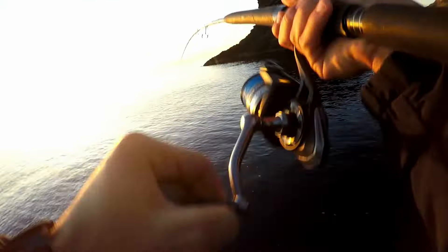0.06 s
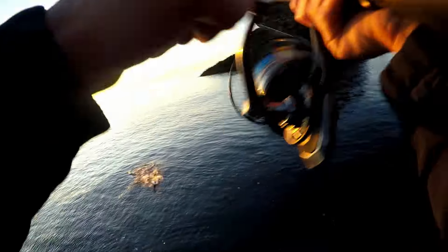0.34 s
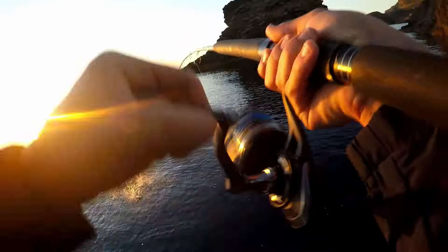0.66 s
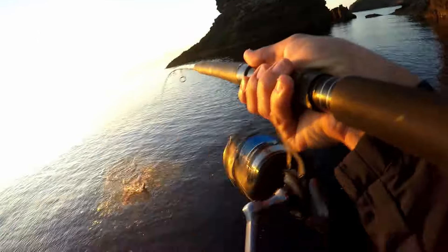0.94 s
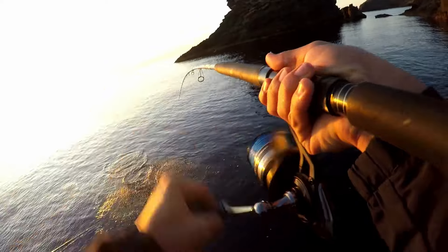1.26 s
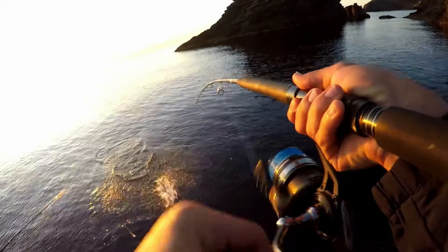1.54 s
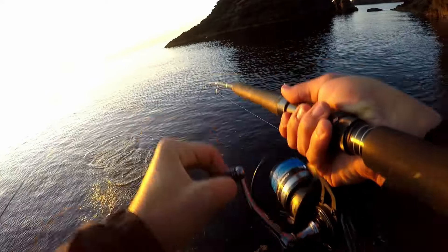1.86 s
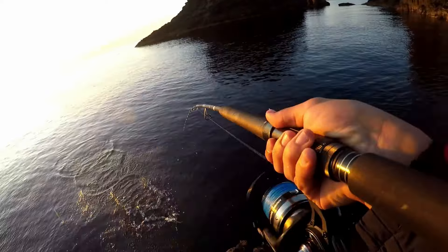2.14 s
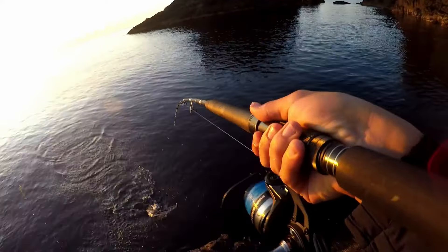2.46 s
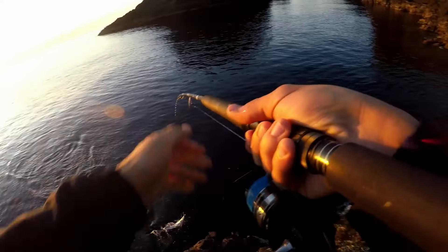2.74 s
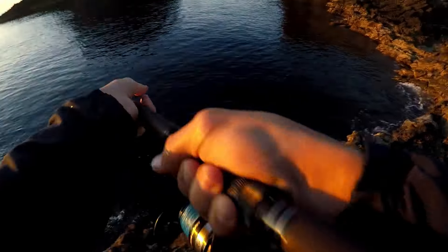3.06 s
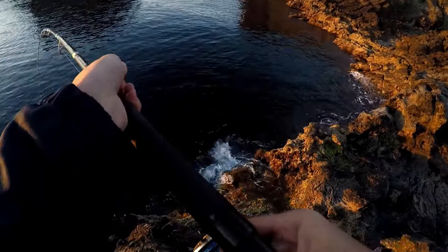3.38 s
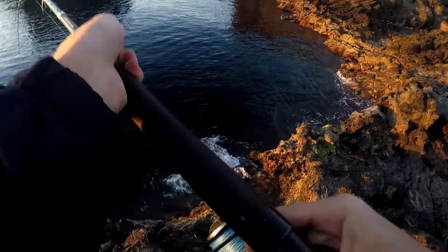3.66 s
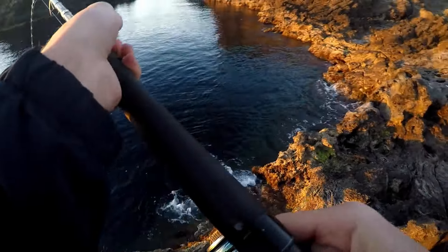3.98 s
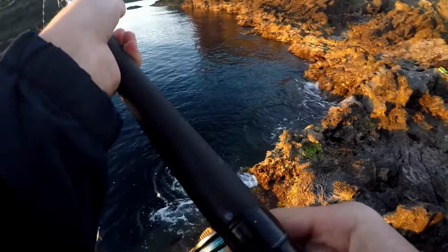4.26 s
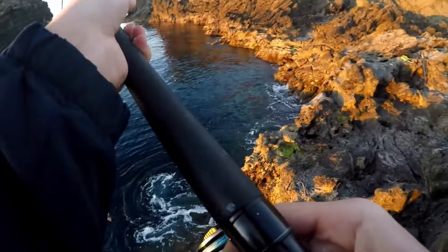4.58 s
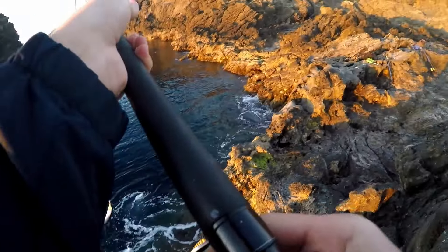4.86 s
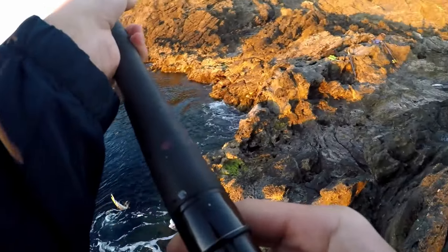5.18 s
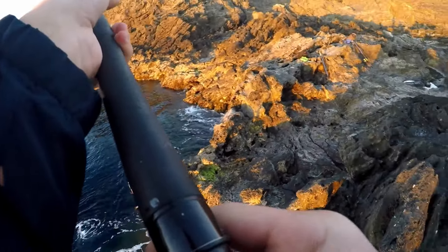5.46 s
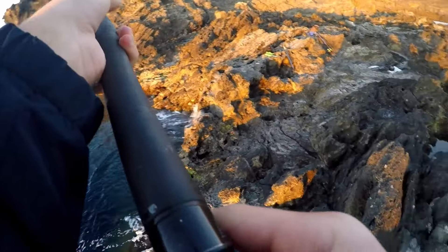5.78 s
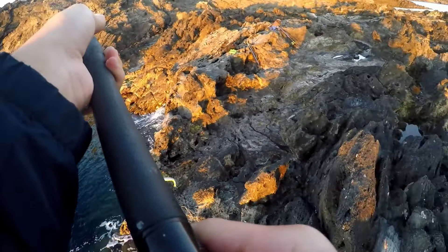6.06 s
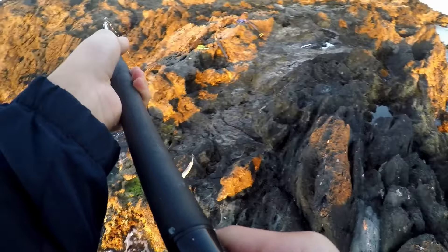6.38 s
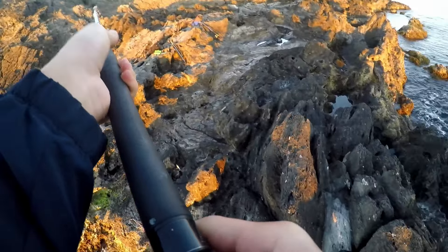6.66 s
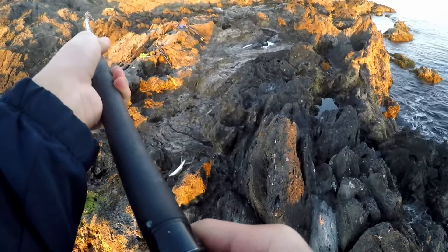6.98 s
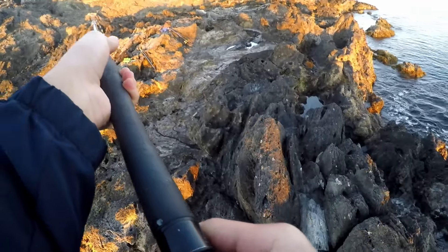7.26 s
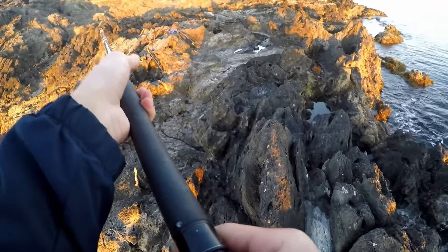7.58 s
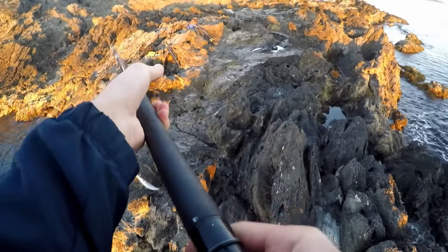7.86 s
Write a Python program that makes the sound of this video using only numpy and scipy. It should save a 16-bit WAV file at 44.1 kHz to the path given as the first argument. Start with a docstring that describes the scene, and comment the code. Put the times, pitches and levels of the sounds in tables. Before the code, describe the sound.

A fishing reel is cranked close by, whirring with fine ticks and short, shaky squeaks for about three seconds. Cloth then rubs heavily across the body-worn camera, and its plastic housing gives dull, ringing knocks through the rest, joined by small tackle clicks and a couple of rod clacks. Throughout, sea water gurgles and splashes among the rocks under low, gusty wind on the microphone, starting in mono and opening into stereo.

```python
"""A rocky shore, where someone is fishing, heard from a body-worn camera in a plastic housing.
A spinning reel whirrs, ticks and squeaks as a small fish is wound in, and clacks against the rod.
Then a sleeve drags past, knocks set the housing ringing, and bits of tackle click.
All along, waves gurgle, splash and fizz in the cove, and wind rumbles on the two microphone
openings (the ports). The sound starts in mono and widens to stereo."""
import sys
import numpy as np
from scipy import signal
from scipy.io import wavfile
from scipy.ndimage import uniform_filter1d

SR = 44100
rng = np.random.default_rng(int(sys.argv[2]) if len(sys.argv) > 2 else 0)


def store_wav(level_fs):
    """Save 16-bit WAV to argv[1]."""
    pcm = np.round(np.clip(np.atleast_2d(level_fs), -1, 1) * 32767)
    wavfile.write(sys.argv[1], SR, pcm.T.astype(np.int16))


N = 354123
TIME = np.arange(N) / SR

# how hard the reel is cranked: (time [s], level [dB])
CRANKING = [(0, -39), (.2, -46), (.35, -38), (.8, -35.5), (1.1, -41), (1.3, -34.5), (1.7, -38.5),
            (2.1, -37.5), (2.301, -45), (2.6, -48), (3, -100)]
# the sleeve drags over the housing: (start [s], length [s], level [dB])
SLEEVE_DRAGS = [(2.52, 0.063, -30), (2.798, 0.028, -20), (2.86, .075, -20), (2.95, 0.19, -22),
                (3.03, 0.08, -22.5), (7.92, .1, -23)]


def reel():
    """Turning gears buzz and make the reel's body ring with a whirr, while the spool squeaks."""
    # ringing notes of the reel's body: (pitch [Hz], width [Hz], level [dB])
    body_notes = [(1060, 100, -21), (1517, 150, 6), (2320, 120, -6), (2626, 160, 2.5), (3840, 990, 3),
                  (4700, 530, -10), (5520, 320, -0.5), (9350, 2200, -6), (12900, 3100, -1.5)]
    rubbing = rng.standard_normal(N) * from_db(2.2 * drift(190) + 2.2 * drift(23))
    teeth = chatter(per_s=95, unevenness=0.46) + 0.037 * rubbing
    gear_note = [(2410, 470, 0)]   # the teeth rasp at one pitch
    gears = rms_one(resonate(resonate(teeth, gear_note), gear_note))
    body = rms_one(resonate(rubbing, body_notes))
    whirr = from_db(in_time(CRANKING)) * (body + from_db(-11.5) * gears)
    return filtered(whirr + squeaks(), 5100, "low")


def squeaks():
    """The dry spool sticks and slips, making short, shaky, sliding tones with a rasp below each. A few brief,
    high rows are other sounds: scrapes as the reel clacks in its seat near 1.30 and 1.43 s, and a metallic
    clink at 2.39 s."""
    # (start [s], length [s], level [dB], first pitch [Hz], last pitch [Hz], pitch shake [Hz], rasp [dB])
    squeals = [(.078, .05, -42, 1200, 2600, 220, -3), (.1, .055, -39, 1500, 1600, 240, -12),
               (.278, .07, -35.5, 1200, 2750, 130, -12), (.294, .036, -40, 2050, 2800, 120, 2),
               (.372, .024, -44, 3600, 4050, 60, -25), (.67, .047, -39, 2500, 2600, 190, -14),
               (.825, .053, -37.5, 2700, 2600, 190, -18), (1.02, .05, -31, 2640, 2400, 200, -11),
               (1.13, .05, -33, 2300, 2480, 190, -11), (1.299, .022, -34, 5700, 5600, 600, 0),
               (1.311, .022, -26.5, 1620, 1270, 90, -16), (1.304, .03, -31.5, 1900, 2750, 240, -10),
               (1.33, .034, -34, 2620, 2330, 200, -12), (1.382, .028, -38, 2400, 2300, 260, -1),
               (1.42, .04, -28, 2200, 2330, 320, -2), (1.425, .035, -38.5, 3900, 4000, 240, 0),
               (1.486, .023, -24.5, 2790, 2700, 80, -3), (1.567, .032, -32, 2640, 2460, 130, -2),
               (1.667, .038, -35.5, 2480, 2560, 190, -6), (1.835, .05, -39, 2300, 2357, 170, -11),
               (1.96, .053, -40, 2330, 2450, 200, -8), (2.118, .05, -36.5, 2400, 2470, 140, -11),
               (2.37, .05, -37, 2120, 2020, 130, -14), (2.392, .026, -37, 4200, 4150, 180, -16)]
    rasp_ratio = 0.66   # the rasp's pitch as a share of the tone's
    shake = filtered(drift(500), 100, "high")
    flutter = evened(from_db(3 * drift(190)), window_s=.03)
    slips = chatter(per_s=173.3, unevenness=.35)
    grabs = signal.lfilter([1], [1, -np.exp(-1 / (.002 * SR))], slips)   # each fades over about 2 ms
    rasp = evened(filtered(rng.standard_normal((2, N)) * (grabs + 0.28), 255, "low"), window_s=0.022)
    out = np.zeros(N)
    for start, length, db, from_hz, to_hz, shake_hz, rasp_db in squeals:
        now = (TIME >= start) & (TIME < start + length)
        hz = np.linspace(from_hz, to_hz, now.sum()) + shake_hz * shake[now]
        angle = 2 * np.pi * np.cumsum(hz) / SR
        tone = np.sqrt(2) * np.sin(angle) * flutter[now]
        scrape = rasp[0, now] * np.cos(rasp_ratio * angle) + rasp[1, now] * np.sin(rasp_ratio * angle)
        out[now] += from_db(db) * swell(start, length)[now] * (tone + from_db(rasp_db) * scrape)
    return out


def line():
    """The line snaps onto the spool in fine, bright ticks while the reel turns."""
    # ringing notes of one tick: (pitch [Hz], width [Hz], level [dB])
    tick_notes = [(5770, 170, 14), (8700, 1500, -24), (13500, 1500, -17)]
    times, db = scattered((CRANKING[0][0], CRANKING[-1][0]), per_s=12, level_db=14, spread_db=6)
    return resonate(clicks_at(times, from_db(db)) * from_db(in_time(CRANKING)), tick_notes)


def rod():
    """The reel clacks in its seat: each hit crunches and rings the seat, the rod and the reel's frame."""
    # how hard each part is hit: (time [s], seat [dB], rod [dB], frame [dB])
    clacks = [(1.3025, -27, -31, -18), (1.3078, -22, -30, -16), (1.3128, -24, -32, -23),
              (1.3272, -30, -28, -20), (6.6272, -18, -13, -32), (6.6288, -18.5, -14, -30),
              (6.634, -27, -30, -40), (7.899, -29, -36, -45), (7.9217, -16, -16, -34),
              (7.9245, -23, -23, -36)]
    # notes of the bright seat, the woody rod and the frame: (pitch [Hz], level [dB], ring time [s])
    seat_notes = [(2540, -1, 0.0057), (3800, -4.5, 0.008), (6140, -11, 0.018), (6850, -23, 0.012),
                  (12200, -26, 0.0056)]
    rod_notes = [(507, -6.5, 0.013), (1000, -7, 0.014)]
    frame_notes = [(1415, 2.5, 0.017), (2150, -9, 0.018)]
    times, seat_db, rod_db, frame_db = np.transpose(clacks)
    grit = evened(filtered(rng.standard_normal(N), [700, 6000], "band"), window_s=.003)
    out = dying(times, seat_db - 6, ring_s=.016) * grit
    for notes, hit_db in ((seat_notes, seat_db), (rod_notes, rod_db), (frame_notes, frame_db)):
        out += ring_notes(clicks_at(times, from_db(hit_db)), notes)
    return out


def tackle():
    """Small hard bits of tackle hit each other: a bright crack with a lower, slightly longer body."""
    # sharp ticks: (time [s], level [dB], body compared with that level [dB])
    ticks = [(.836, -31, -12), (2.3934, -24, -6), (2.403, -22.5, -10), (2.4685, -31, 0), (2.677, -32, -3),
             (2.833, -33, 0), (2.8918, -27, -12), (3.052, -25, 2), (4.089, -25, -15), (4.5763, -21.5, -20),
             (6.6041, -18, -14), (7.199, -23, -10), (7.5004, -19.5, -8), (7.511, -23, -18),
             (7.755, -20, -12), (7.9217, -19, -14)]
    # tone colour of the crack: (pitch [Hz], level [dB])
    crack_colour = [(2000, -12), (3800, 1), (6000, 6.5), (8500, 5), (11000, -25), (13000, -21),
                    (14800, -14)]
    # lighter ticks as the catch swings on the line
    light_s, light_db = scattered((6.9, 8), per_s=9, level_db=-30, spread_db=2.5)
    light_ticks = [(s, db, -9) for s, db in zip(light_s, light_db)]
    times, db, body_db = np.transpose(list(ticks) + light_ticks)
    snap = dying(times, db - 4, ring_s=.006) + dying(times, db - 9, ring_s=.024)
    crack = evened(turbulence(crack_colour, patchy_db=1.5, flicker_hz=150, bands=7), window_s=.004)
    body = rms_one(filtered(rng.standard_normal(N), [900, 3200], "band"))
    return snap * crack + dying(times, db + body_db - 6, ring_s=.03) * body


def housing():
    """Each knock rocks the housing and adds a dull thud; now and then it wobbles on its mount."""
    # (time [s], low notes [dB], high notes [dB], thud [dB], treble limit [Hz])
    knocks = [(.569, -24, -20, -30, 1000), (1.435, -25, -36, -14, 600), (2.065, -14, -19, -30, 900),
              (2.555, -20, -18, -11, 950), (2.747, -35, -8.5, -37, 900), (2.7995, -13, -5.5, -7.5, 1050),
              (2.904, -17, -12, -11, 1100), (2.958, -18, -15, -8, 900), (3.036, -9, -20, -10, 700),
              (3.06, -17, -7, -11, 950), (3.072, -17, -7, -12, 1000), (3.495, -24, -30, -10, 800),
              (3.832, -18.5, -19, -8.5, 900), (4.269, -18, -36, -17, 800), (4.443, -12, -12, -12, 1100),
              (4.837, -13, -13, -9, 950), (4.862, -18, -28, -10, 600), (4.981, -10, -6.5, -9, 1700),
              (5.266, -22, -16, -25, 950), (5.354, -12.5, -10, -13, 1550), (5.455, -21, -14.5, -18, 950),
              (5.654, -12.5, -14.5, -8.5, 1000), (5.801, -19, -32, -12.5, 800),
              (6.53, -16, -14.5, -10, 1500), (6.651, -9, -5.5, -25, 1200), (6.775, -12, -10, -12, 1100),
              (6.958, -13, -9, -14.5, 1200), (7.19, -20, -24, -12, 800), (7.926, -15, -22, -5.5, 1000)]
    # (start [s], length [s], pitch [Hz], level [dB])
    wobbles = [(2.883, 0.054, 85.6, -12.5), (3.041, .085, 91.7, -16), (4.896, 0.066, 81, -17),
               (5.247, 0.029, 288, -23)]
    # lighter knocks while the rod is lifted
    light_s, light_db = scattered((3.2, 8), per_s=3.5, level_db=-23.5, spread_db=2.5)
    light_knocks = [(s, db, db, db, 800) for s, db in zip(light_s, light_db)]
    detunes = 1 + 0.022 * rng.uniform(-1, 1, size=256)   # the grip shifts each knock's pitch a little
    blow = signal.unit_impulse(SR // 5)
    out = np.zeros((2, N + SR))
    for (start, low_db, high_db, thud_db, top_hz), detune in zip(list(knocks) + light_knocks, detunes):
        thud = filtered(ring(blow * from_db(thud_db - 5), hz=170 * detune, ring_s=.055), top_hz, "low")
        first = int(start * SR)
        out[:, first:first + len(blow)] += rocking(blow, low_db, high_db, top_hz, detune) + thud
    wobble = sum(from_db(db) * swell(start, length) ** 2 * np.sin(2 * np.pi * hz * (TIME - start))
                 for start, length, hz, db in wobbles)
    return out[:, :N] + wobble


def rocking(blows, low_db, high_db, top_hz, detune=1.0):
    """The housing rings, pushing one port in and the other out; soft blows hold no treble."""
    # ringing notes of the housing: (pitch [Hz], level [dB], ring time [s])
    low_notes = [(227, -6.5, 0.09), (340, -4, 0.054), (422, -5, 0.052), (563, -3, 0.015)]
    high_notes = [(805, -6, .024), (1020, -15, .018), (1160, -20, .018), (1320, -17, .018),
                  (1450, -17, .018)]
    low = ring_notes(blows * from_db(low_db), low_notes, detune)
    high = ring_notes(blows * from_db(high_db), high_notes, detune)
    ports = np.outer((1.6, -.75), low) + np.outer((1.6, -.5), high)   # gains are (left, right)
    return filtered(filtered(ports, 150, "high"), top_hz, "low", order=4)


def sleeve():
    """Cloth drags heavily over the housing and slips with hollow, falling thumps."""
    # thumps: (time [s], first pitch [Hz], last pitch [Hz], slide time [s], level [dB], ring time [s])
    slips = [(2.799, 380, 84.5, 0.0066, -15, 0.054), (2.86, 517, 95, 0.0145, -9, 0.15),
             (3.022, 855, 300, 0.0125, -19.5, 0.081), (3.061, 470, 130, 0.0116, -11.5, .07),
             (4.84, 254, 110, 0.013, -15, 0.12)]
    # tone colour of the drag: (pitch [Hz], level [dB])
    drag_colour = [(55, 2.5), (85, 6.5), (170, 5), (260, -1), (380, -21), (600, -20), (850, -23),
                   (1400, -26)]
    rub = evened(turbulence(drag_colour, patchy_db=1.5, flicker_hz=45.4, bands=7), window_s=0.031)
    out = strokes(SLEEVE_DRAGS) * rub
    for start, from_hz, to_hz, slide_s, db, ring_s in slips:
        age = np.maximum(TIME - start, 0)
        turns = to_hz * age + (from_hz - to_hz) * slide_s * (1 - np.exp(-age / slide_s))
        loudness = (1 - np.exp(-age / .001)) * from_db(db - np.minimum(60 * age / ring_s, 200))
        out += np.sin(2 * np.pi * turns) * loudness
    return out


def judder():
    """The dragging sleeve sticks and slips, shaking the housing with a run of small, soft blows."""
    blows = strokes(SLEEVE_DRAGS) * chatter(per_s=74, unevenness=0.65)
    return rocking(blows, low_db=-5, high_db=-5, top_hz=840)


def swishes():
    """Brief, soft, bright swishes of noise."""
    # (start [s], length [s], level [dB])
    bursts = [(2.388, 0.037, -39), (2.9, 1.25, -45.5), (2.93, 0.22, -43), (3.025, 0.08, -39),
              (4.083, 0.013, -38), (6.415, 0.065, -36), (6.599, 0.011, -30), (6.614, 0.01, -33),
              (7.248, 0.043, -35), (7.5, 0.04, -37.5), (7.914, .01, -34), (7.935, 0.14, -38)]
    # their tone colour: (pitch [Hz], level [dB])
    swish_colour = [(1500, -8), (3000, 9), (4000, 0.5), (5000, 8.5), (6200, 11), (8500, 0.5), (10500, -18),
                    (12800, -15), (14800, -32)]
    return strokes(bursts) * turbulence(swish_colour, patchy_db=3.5, flicker_hz=110, bands=8)


def sea():
    """Water gurgles among the rocks, murmurs in a hollow, splashes and fizzes as foam."""
    # tone colours of the water: (pitch [Hz], level [dB])
    gurgle_colour = [(150, -22), (240, -5.5), (340, 5.5), (460, -5), (580, 3), (820, -9), (1300, -11.5)]
    splash_colour = [(600, 1), (1080, 2), (1400, -2), (1900, -2), (2500, -2.5), (3200, -6), (3950, -6),
                     (4700, -12.5), (6500, -4.5)]
    foam_colour = [(4000, -18), (5200, -28), (6200, 12.5), (7600, 7), (8800, 0), (11000, -6.5),
                   (13000, -18), (14800, -46)]
    # splash and foam as the listener turns toward the rocks: (time [s], level [dB])
    facing = [(0, 2.5), (1.7, 0), (2.6, -4.5), (8, 7.5)]
    gurgle_gain, hollow_gain, splash_gain, heavy_gain, foam_gain = wave_gains()
    gurgle = turbulence(gurgle_colour, patchy_db=4.5, flicker_hz=18.8, bands=6)
    gurgle += 0.58 * bubbles(gurgle_colour, per_s=220, cycles=14, spread_db=4.0, pitches=12)
    splash = turbulence(splash_colour, patchy_db=2.0, flicker_hz=26.3, bands=12)
    splash += 0.27 * bubbles(splash_colour, per_s=900, cycles=21, spread_db=3.0, pitches=20)
    # heavy splashes trap bigger bubbles, which ring lower
    splash = splash_gain * splash + (heavy_gain - splash_gain) * resonate(splash, [(910, 1060, 0)])
    foam = turbulence(foam_colour, patchy_db=2.5, flicker_hz=23.9, bands=8)
    foam += 0.34 * bubbles(foam_colour, per_s=3000, cycles=53, spread_db=9.5, pitches=12)
    foam *= from_db([[-3.5], [2.6]])   # louder on the right
    spray = from_db(in_time(facing)) * (splash + foam_gain * foam)
    return gurgle_gain * evened(gurgle, window_s=0.4) + hollow_gain * hollow() + spray


def wave_gains():
    """Waves add their power to the calm sea; gives gains of gurgle, hollow, splash, heavy splash, foam."""
    # waves running up the rocks: (start [s], hold [s], gurgle [dB], splash [dB], foam [dB],
    # the hollow's share of the gurgle [0-1], extra weight of the splash [dB])
    waves = [(0.01, 0.4, -38.5, -52.5, -62, 0, 10), (0.695, 0.054, -37, -42.5, -64, 0.4, 3.5),
             (1.37, 0.56, -34, -41, -50.5, 0.07, 0), (2.252, 0.36, -59, -38.5, -45, 0.34, 4.5),
             (2.694, 0.63, -31.5, -29.5, -40, 0.87, 1), (3.92, 0.051, -36, -38.5, -47, 0.15, -4),
             (4.352, 0.36, -66, -43.5, -48, 0.62, -5), (5.192, 0.34, -34, -48, -55.5, 1, 3),
             (5.81, 0.067, -35.5, -44, -53.5, 1, 0.5), (6.528, 0.16, -36, -52.5, -52.5, 0.3, 12),
             (7.595, 0.35, -60, -64, -54.5, 0.2, -15)]
    calm_water, splash, heavy, foam = from_db([-42, -51, -46, -54.5]) ** 2   # the sea between waves
    calm_share = 0.22
    gurgle, murmur = calm_water * (1 - calm_share), calm_water * calm_share
    for start, hold, gurgle_db, splash_db, foam_db, share, weight_db in waves:
        water = surge(start, hold, gurgle_db, fall_db_per_s=23.5) ** 2
        spray = surge(start, hold, splash_db, fall_db_per_s=17.5) ** 2
        gurgle += (1 - share) * water
        murmur += share * water
        splash += spray
        heavy += spray * from_db(weight_db) ** 2
        foam += surge(start, hold, foam_db, fall_db_per_s=18.5) ** 2
    return np.sqrt([gurgle, murmur, splash, heavy, foam])


def surge(start, hold, db, fall_db_per_s, rise_s=0.18):
    """The strength of one wave as it rises, holds and drains away."""
    age = TIME - start
    return np.clip(age / rise_s, 0, 1) * from_db(db - fall_db_per_s * np.maximum(age - rise_s - hold, 0))


def bubbles(colour, per_s, cycles, spread_db, pitches):
    """Bubbles of random size ring briefly, each somewhere between left and right."""
    draws = rng.random((6, 40000))
    happens = draws[1] < per_s * N / SR / draws.shape[1]
    when, _, size, pitch, place, sign = draws[:, happens]
    sizes = from_db(spread_db * np.minimum(-np.log(size), 4)) * np.sign(sign - .5)
    out = np.zeros((2, N))
    for k, hz in enumerate(np.geomspace(colour[1][0], colour[-2][0], pitches)):
        chosen = (pitch * pitches).astype(int) == k
        pops = np.array([clicks_at(when[chosen] * N / SR, (sizes * np.sqrt(share))[chosen])
                         for share in (place, 1 - place)])
        out += ring(pops, hz, cycles / hz) * hz * from_db(at_hz(colour, hz))
    return rms_one(out)


def hollow():
    """A hollow in the rocks turns the rush of water into a low murmur."""
    # notes of the hollow: (pitch [Hz], width [Hz], level [dB])
    hollow_notes = [(311, 29.4, 8.5), (467.4, 70, 1.5)]
    centre, side = resonate(resonate(rng.standard_normal((2, N)), hollow_notes), [(399, 54, 0)])
    return evened(centre + 0.61 * side * np.array([[1], [-1]]), window_s=0.18)


def shower():
    """Fine droplets from the largest wave patter back onto the water in a bright hiss."""
    # peaks in the hiss: (pitch [Hz], width [Hz], level [dB])
    hiss_peaks = [(6130, 390, -3), (7100, 450, -4), (12400, 1900, -18)]
    drops = rng.standard_normal((2, N)) * from_db(2.5 * drift(120))
    centre, side = sum(resonate(resonate(drops, [(hz, width, db)]), [(hz, width, 0)])
                       for hz, width, db in hiss_peaks)
    hiss = rms_one(centre + .5 * side * np.array([[1], [-1]]))
    return from_db(-47.5) * swell(start=3.05, length=0.99) * hiss


def wind():
    """Swirls of air press on both ports: big ones rumble, and smaller ones buffet in uneven puffs."""
    # strength of the big and the smaller swirls: (time [s], level [dB])
    rumble_levels = [(0, -30.5), (.48, -27.5), (.56, -20.5), (1.2, -16.5), (1.55, -20), (2.1, -27.5),
                     (2.36, -22.5), (2.5, -15.5), (2.8, -24), (3.35, -21.5), (3.6, -17), (4.4, -18),
                     (4.64, -14.5), (4.8, -20), (5.6, -15), (6.27, -20.5), (6.55, -15), (7.45, -15),
                     (7.75, -17.5), (8.03, -16)]
    buffet_levels = [(0, -38), (.22, -40), (.3, -29.5), (.47, -33.5), (.57, -25.5), (.9, -32), (1.5, -30),
                     (2.1, -31), (2.55, -31), (3.45, -24), (3.65, -30.5), (4.0, -37), (4.4, -29),
                     (4.68, -39), (4.95, -20), (5.14, -39.5), (5.5, -27.5), (6.25, -36), (6.65, -27.5),
                     (7.25, -32.5), (7.55, -29), (8.03, -29.5)]
    # their tone colours: (pitch [Hz], level [dB])
    rumble_colour = [(9, 19.5), (15, -8.5), (22, 8), (32, -5.5), (48, -11), (70, -26)]
    buffet_colour = [(45, -23), (70, 2), (100, -5), (130, -13.5), (175, -1.5), (230, -10), (400, -21.5)]
    puffs = from_db(0.5 * np.tanh(drift(2.6)))
    # as the sound widens to stereo, the wind becomes quieter on the left
    drop_db = np.interp(TIME, (1.95, 2.3), [0, -6.5])
    own, shared = turbulence(rumble_colour, patchy_db=-4.0, flicker_hz=4.9, bands=4)
    left = filtered(shared + 0.5 * own, 38.0, "high", order=1)   # this port leaks the deepest pressure
    rumble = np.array([left * from_db(drop_db), shared])
    rumble /= np.sqrt(uniform_filter1d(widen(rumble).mean(axis=0) ** 2, SR // 8) + 1e-6)   # steady it
    buffet = evened(turbulence(buffet_colour, patchy_db=5.0, flicker_hz=24.3, bands=6), window_s=0.29)
    # small swirls pass between the ports and push them in opposite ways
    between = rms_one(filtered(rng.standard_normal(N), [40, 90], "band")) * np.array([[-.6], [1]])
    buffet = (buffet + 1.34 * between) * from_db(np.outer([.7, .08], drop_db))
    rumble += 0.064 * between
    return from_db(in_time(rumble_levels)) * rumble + from_db(in_time(buffet_levels)) * puffs * buffet


def turbulence(colour, patchy_db, flicker_hz, bands):
    """Stereo noise in bands whose levels flicker partly together, partly alone."""
    # how alike left and right are: (pitch [Hz], likeness [0-1])
    likeness = [(100, 0.71), (200, 1), (300, 1), (500, 0.75), (900, 0.037), (1600, 0.14), (2500, 0.53),
                (3800, 1), (5500, 0.14), (8000, 0.021), (13000, 0.1)]
    edges = np.geomspace(colour[0][0], colour[-1][0], bands + 1)
    together = drift(flicker_hz / 2)
    white = rng.standard_normal((2, 2, N))
    out = 0
    for k, (low, high) in enumerate(zip(edges, edges[1:])):
        centre, side = filtered(white[k % 2], [low, high], "band")
        hz = np.sqrt(low * high)
        alike = at_hz(likeness, hz)
        gain = from_db(at_hz(colour, hz) + patchy_db * (0.58 * together + drift(flicker_hz)))
        out += gain * (np.sqrt(1 + alike) * centre + np.sqrt(1 - alike) * side * [[1], [-1]])
    return rms_one(out)


def chatter(per_s, unevenness):
    """Uneven clicks of varying strength, as when something sticks and slips."""
    turns = np.floor(np.cumsum(per_s * np.exp(unevenness * drift(60))) / SR)
    return np.diff(turns, prepend=0) * from_db(2 * drift(80))


def scattered(span_s, per_s, level_db, spread_db):
    """Times and levels of small hits that come at uneven intervals."""
    jitter, size = rng.random((200, 2)).T
    times = span_s[0] + (np.arange(len(jitter)) + jitter) / per_s
    inside = times < span_s[1]
    return times[inside], (level_db + spread_db * np.sqrt(12) * (size - .5))[inside]


def drift(hz):
    """A smooth random wander of typical size 1; a higher hz makes it quicker."""
    step = 40   # samples between random values
    r = np.exp(-2 * np.pi * hz * step / SR)
    slow = signal.lfilter([1], [1, -2 * r, r * r], rng.standard_normal(N // step + 2002))[2000:]
    return np.interp(np.arange(N) / step, np.arange(len(slow)), rms_one(slow))


def ring(clicks, hz, ring_s):
    """Each click starts a pure tone that fades by 60 dB in ring_s."""
    r, w = from_db(-60 / (ring_s * SR)), 2 * np.pi * hz / SR
    return signal.lfilter([0, np.sin(w)], [1, -2 * r * np.cos(w), r * r], clicks + 1e-18)


def ring_notes(clicks, notes, detune=1.0):
    """A struck object rings with all its notes at once."""
    return sum(ring(clicks * from_db(db), hz * detune, ring_s) for hz, db, ring_s in notes)


def resonate(x, notes):
    """Pick out a band of the sound around each note and add the bands up."""
    out = 0
    for hz, width, db in notes:
        r = np.exp(-np.pi * width / SR)
        feedback = [1, -2 * r * np.cos(2 * np.pi * hz / SR), r * r]
        out += from_db(db) * signal.lfilter(np.array([1, 0, -1]) * (1 - r * r) / 2, feedback, x + 1e-18)
    return out


def clicks_at(times, sizes):
    """Single clicks at the given times."""
    out = np.zeros(N)
    out[np.clip(np.round(np.asarray(times) * SR).astype(int), 0, N - 1)] = sizes
    return out


def dying(times, level_db, ring_s):
    """Sudden jumps in loudness that fade by 60 dB in ring_s."""
    fade = from_db(-60 / (ring_s * SR))
    return signal.lfilter([1], [1, -fade], clicks_at(times, from_db(level_db)) + 1e-18)


def swell(start, length):
    """A rounded rise and fall."""
    return np.sqrt(np.abs(np.sin(np.pi * np.clip((TIME - start) / length, 0, 1))))


def strokes(rows):
    """The loudness of a series of rounded bursts."""
    return sum(from_db(db) * swell(start, length) for start, length, db in rows)


def evened(x, window_s):
    """Even out swings in level that are slower than window_s."""
    power = np.mean(np.atleast_2d(x) ** 2, axis=0)
    return x / np.sqrt(uniform_filter1d(power, int(window_s * SR)) + 1e-9)


def filtered(x, hz, kind, order=2):
    """Keep the lows, the highs or one band of a sound."""
    return signal.sosfilt(signal.butter(order, hz, kind, fs=SR, output="sos"), x + 1e-18)


def from_db(db):
    """Turn decibels into a gain."""
    return 10 ** (np.asarray(db) / 20)


def rms_one(x):
    """Scale a sound so that its average size (rms) is 1."""
    return x / np.sqrt(np.mean(x ** 2) + 1e-20)


def in_time(points):
    """Join (time, value) points into a curve with a value for every sample."""
    return np.interp(TIME, *np.transpose(points))


def at_hz(points, hz):
    """Read between (pitch, value) points, with octaves evenly spaced."""
    pitches, values = np.transpose(points)
    return np.interp(np.log(hz), np.log(pitches), values)


def widen(x):
    """Both ears hear the left port at first; then the right port fades in."""
    share = np.interp(TIME, (1.643, 2.12), [0, 1])
    return np.array([x[0], (1 - share) * x[0] + share * x[1]])


def scene():
    """All the sources together at the two ports."""
    return (wind() + sea() + reel() + line() + housing() + sleeve() + swishes() + judder()
            + tackle() + rod() + shower())


def record(dry):
    """The camera rounds off loud peaks, widens from mono to stereo and cuts the highest treble."""
    ceiling, cutoff_hz = 0.8, 14900
    rounded = dry / (1 + (dry / ceiling) ** 4) ** (1 / 4)
    return signal.sosfilt(signal.ellip(10, .1, 90, cutoff_hz, fs=SR, output="sos"), widen(rounded))


dry = scene()
out = record(dry)
store_wav(out)
```